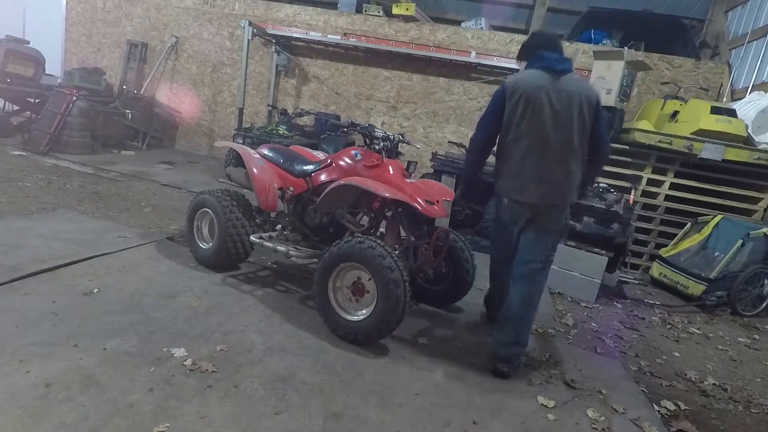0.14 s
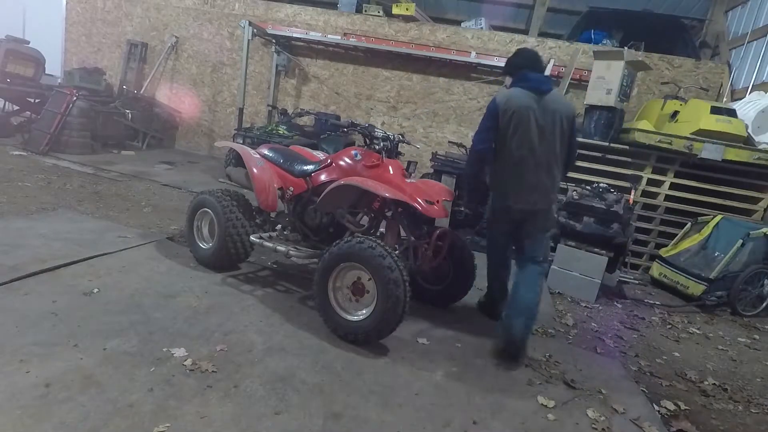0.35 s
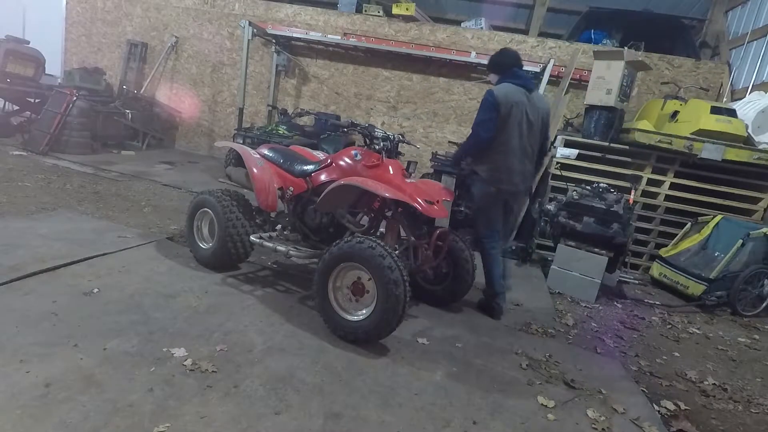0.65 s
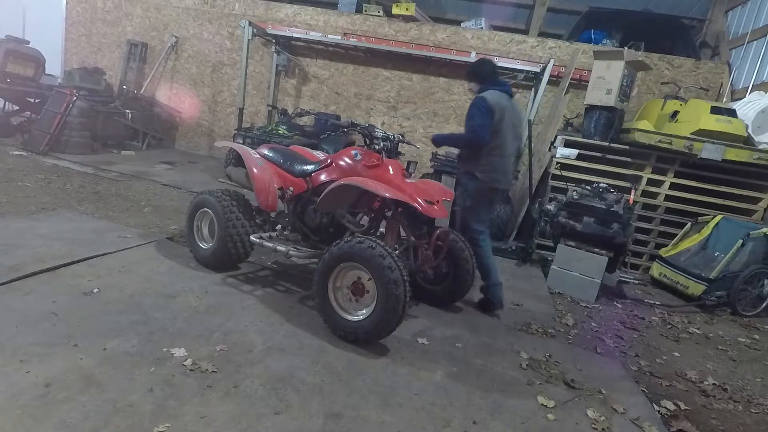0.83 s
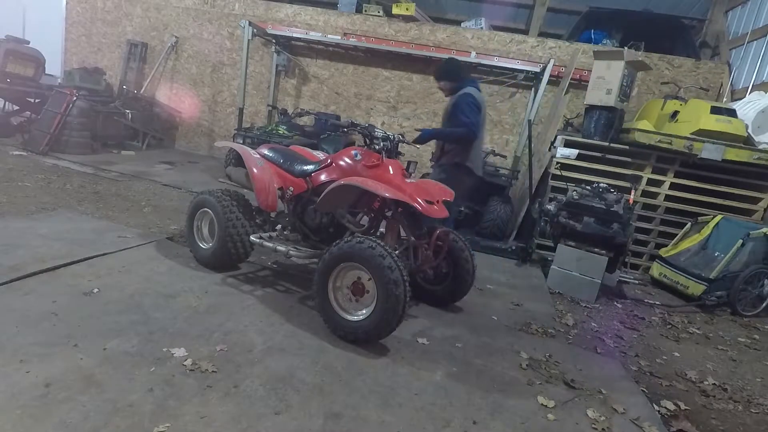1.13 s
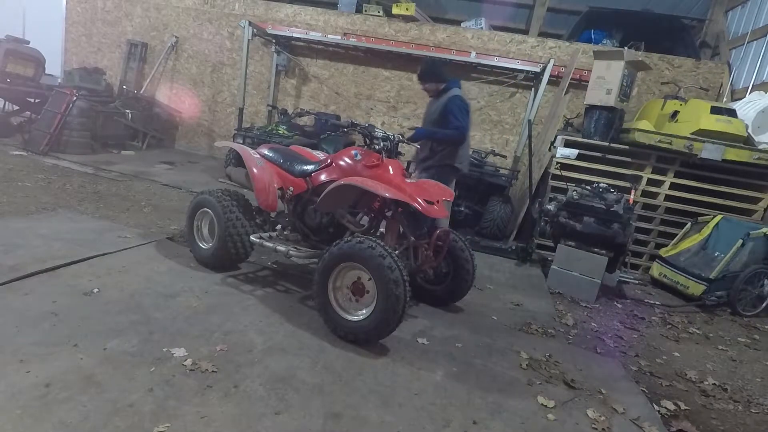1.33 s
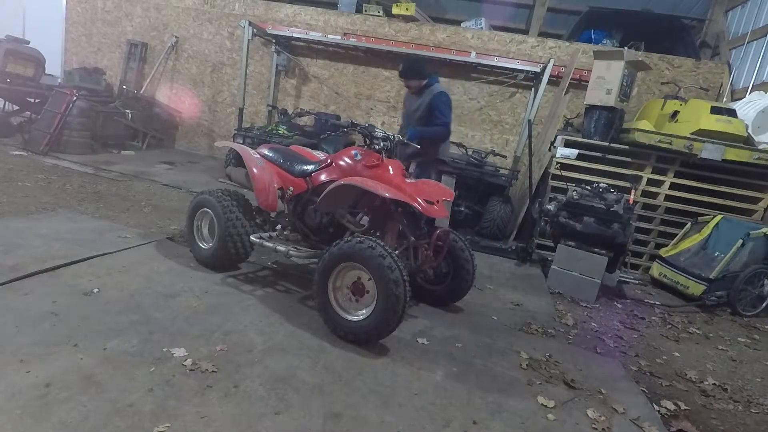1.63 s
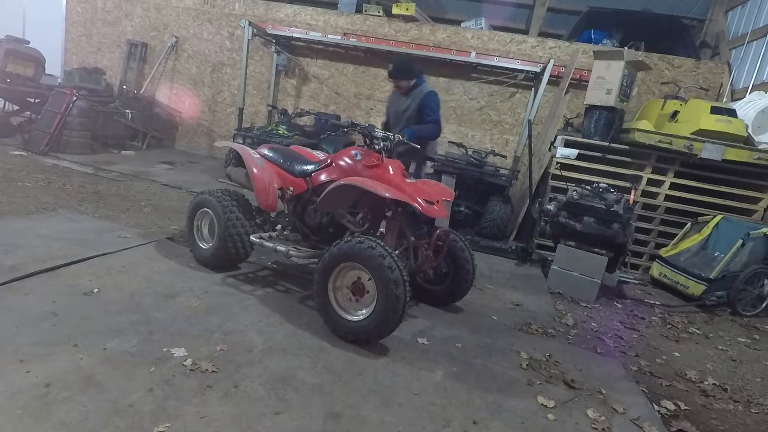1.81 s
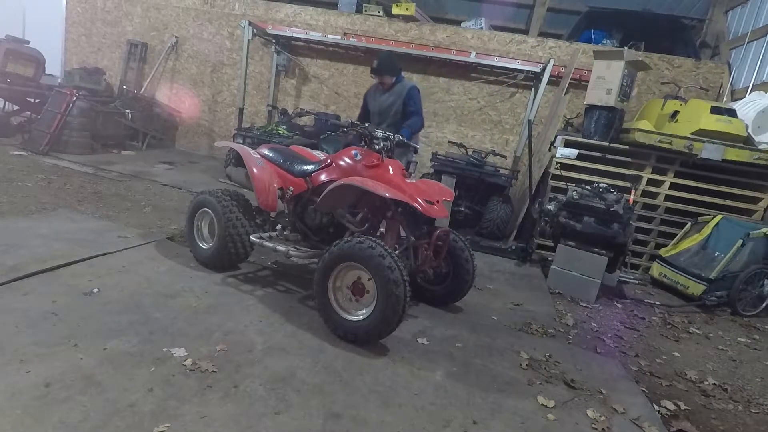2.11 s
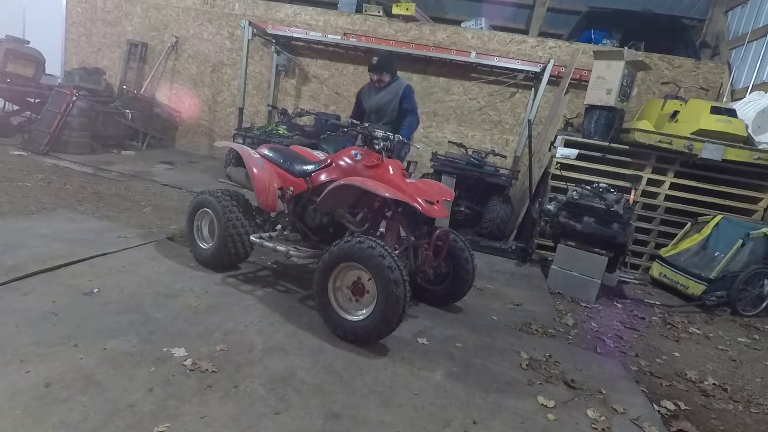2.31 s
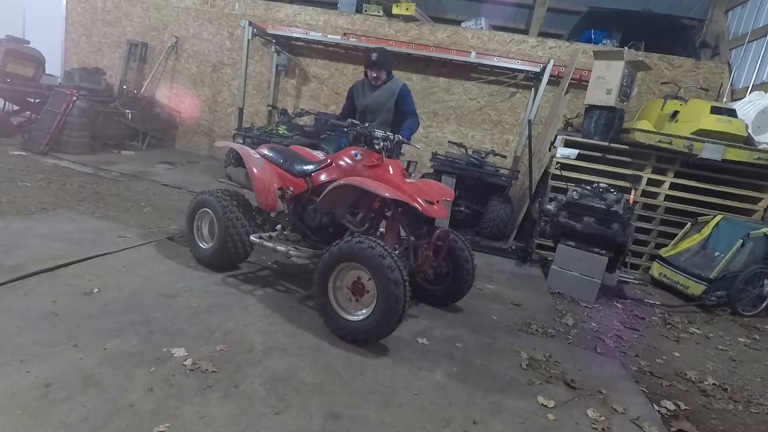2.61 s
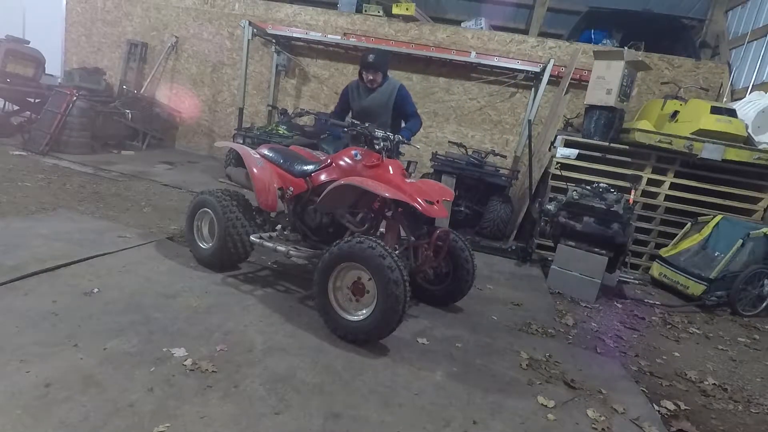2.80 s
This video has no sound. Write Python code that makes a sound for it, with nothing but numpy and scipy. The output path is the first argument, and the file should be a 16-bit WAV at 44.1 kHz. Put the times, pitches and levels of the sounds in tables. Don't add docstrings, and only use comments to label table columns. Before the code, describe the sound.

Dull, soft footsteps with gritty sole scuffs move off across a hard, ringing workshop floor

```python
import sys
import numpy as np
from scipy import signal
from scipy.fft import rfft, irfft, next_fast_len
from scipy.io import wavfile
from scipy.ndimage import map_coordinates

SR = 44100
rng = np.random.default_rng(int(sys.argv[2]) if len(sys.argv) > 2 else 0)


def invert_db(level):
    return 10 ** (np.asarray(level, dtype=float) / 20)


def bounce(signal):
    frames = np.transpose(np.atleast_2d(signal))
    limited = np.clip(frames, -1, 1)
    pcm = np.round(limited * 32767).astype(np.int16)
    wavfile.write(sys.argv[1], SR, pcm)


N = 130095


def unit(x):
    return x / np.sqrt(np.mean(x ** 2) + 1e-20)


def along(points, hz):
    point_hz, value = np.transpose(points)
    return np.interp(np.log(hz + 1), np.log(point_hz + 1), value)


def filtered(x, response):
    size = next_fast_len(len(x) + 8192)
    spectrum = rfft(x, size) * response(np.fft.rfftfreq(size, 1 / SR))
    return irfft(spectrum, size)[:len(x)]


def peak(hz, width):
    return lambda f: 1j * f * width / (hz * hz - f * f + 1j * f * width + 1e-9)


def add(out, start_s, x):
    part = out[max(round(start_s * SR), 0):][:len(x)]
    part += x[:len(part)]


# pitch_hz [Hz], level_db [dB per Hz]
AIR_TONE = [(25, 4), (45, -10), (80, -12), (200, -17.5), (600, -21.5), (1900, -27.5), (3500, -33.5),
            (15500, -39.5)]


def room_air():
    t = np.arange(N) / SR
    hiss = unit(filtered(rng.standard_normal(N), lambda f: invert_db(along(AIR_TONE, f)) * (f > 30)))

    deep = lambda f: peak(15, 27)(f) / (1 + (f / 33) ** 3)
    drift = unit(filtered(rng.standard_normal(N), deep))

    echo_hz = 330
    echo = unit(filtered(rng.standard_normal(N), peak(echo_hz, 2 * echo_hz)))
    echo = echo * invert_db(-48.5 - 60 * t)
    return invert_db(-56.5) * hiss + invert_db(-50) * drift + echo


# pitch_hz [Hz], time to die by 60 dB [s]
RING_TIMES = [(60, 1.3), (200, 1.26), (500, 1.075), (1500, 0.99), (4000, 0.91), (9000, 1.1), (15000, 0.6)]
# pitch_hz [Hz], level_db [dB]
HALL_TONE = [(60, 7), (130, 1.5), (220, 0), (320, -6.2), (700, 3.5), (2500, 2.23), (6000, -0.5), (15000, 1)]


def hall(x):
    first_wall_s, build_s = 0.012, 0.004
    near_t60_s, near_db = 0.083, -9
    hz, t, noise = signal.stft(rng.standard_normal(SR), SR, nperseg=1024)
    fade_db = 60 * t / along(RING_TIMES, hz)[:, None]
    shape = invert_db(along(HALL_TONE, hz)[:, None] - fade_db)
    tail = signal.istft(noise * shape, SR, nperseg=1024)[1][:SR]

    late_s = np.clip(np.arange(SR) / SR - first_wall_s, 0, None)
    build_up = 1 - np.exp(-late_s / build_s)
    near_walls = 1 + invert_db(near_db - 60 * late_s / near_t60_s)
    tail = tail * build_up * near_walls
    return signal.fftconvolve(x, tail / np.linalg.norm(tail))


# [Hz, centre of the hiss]
SCUFF_STROKES = [(0.001, .02, 0.12, -48.5, 3800), (0.081, 0.018, 0.036, -45.5, 6000),
                 (.16, 0.15, 0.17, -50.5, 3830), (0.284, 0.057, 0.034, -47.5, 2380),
                 (.337, 0.051, 0.034, -39, 10000), (0.335, 0.041, 0.017, -42, 2600),
                 (.38, 0.042, 0.023, -52, 6840), (.559, 0.011, 0.016, -48, 2780),
                 (0.666, .02, 0.09, -56.5, 1870), (0.736, 0.0088, 0.1, -57.5, 7000),
                 (0.849, .035, 0.12, -49.5, 4960), (0.854, 0.055, 0.032, -48, 11000),
                 (0.861, 0.071, 0.032, -44.5, 1830), (1.19, .012, 0.096, -56, 9000),
                 (1.289, 0.041, 0.18, -53, 1480), (1.299, 0.24, 0.17, -58, 5850),
                 (1.87, 0.055, 0.18, -53.5, 2310), (1.882, 0.077, 0.066, -59.5, 8840),
                 (2.13, 0.23, 0.27, -62.5, 7140), (2.03, .06, 0.24, -59.5, 1920),
                 (0.241, 0.026, 0.05, -52.5, 12000), (.1, 0.013, 0.047, -49, 10900),
                 (2.599, 0.028, .015, -62, 6950), (2.641, 0.0079, 0.17, -56, 2430),
                 (2.701, 0.055, 0.045, -60.5, 8900)]


def scuffs():
    grains_per_s, grit_db, grain_spread_db = 1200, -7, 2
    slip_db, slips_per_s = 1, 123.4
    hall_db, close_db, walk_away_s = -4.94, 3.5, 0.66
    out = np.zeros(N)
    for peak_s, rise_s, fall_s, level_db, pitch_hz in SCUFF_STROKES:
        t = np.arange(SR // 2) / SR - min(peak_s, 0.2)
        start_s = peak_s + t[0]
        chance, size = rng.random((2, len(t)))
        grit = (chance < grains_per_s / SR) * invert_db(-grain_spread_db * np.log(size + 1e-9))
        grit = invert_db(grit_db) * grit * np.sqrt(SR / grains_per_s)
        rub = rng.standard_normal(len(t)) * (1 + grit)

        band = peak(pitch_hz, 1.47 * pitch_hz)
        hiss = unit(filtered(rub, lambda f: band(f) ** 2))
        swell = np.exp(-2 * (t / rise_s) ** 2)
        fade = np.exp(-2 * (np.abs(t) / fall_s) ** 1.7)
        stroke = np.where(t < 0, swell, fade)
        slip = map_coordinates(rng.standard_normal(90), [(t - t[0]) * slips_per_s])
        scuff = invert_db(level_db + slip_db * slip) * stroke * hiss

        add(out, start_s, scuff)
        echo_db = hall_db - close_db * np.exp(-peak_s / walk_away_s)
        add(out, start_s, invert_db(echo_db) * hall(scuff))
    return out


# [dB, peak]
GRAIN_CRACKS = [
    (.278, -38),
    (.297, -37),
    (.3265, -23),
    (.337, -32),
    (.344, -32),
]


def snaps():
    snap_hz, snap_t60_s = 10000, 0.003
    out, t = np.zeros(N), np.arange(400) / SR
    for start_s, level_db in GRAIN_CRACKS:
        fade = invert_db(level_db - 60 * t / snap_t60_s)
        add(out, start_s, fade * np.sin(2 * np.pi * snap_hz * t))
    return out


# [Hz, centre of the noise]
SOLE_ROLLS = [(0.081, -39.5, 0.027, 387), (.222, -41, 0.11, 330), (0.547, -41.5, 0.02, 250),
              (0.817, -36, 0.033, 242), (0.868, -38.5, 0.051, 305), (1.235, -40.5, 0.013, 510),
              (1.275, -45, 0.042, 263), (1.79, -40, 0.044, 208), (1.85, -48.5, 0.09, 240),
              (2.13, -46, 0.0083, 1250), (2.15, -50.5, 0.042, 1000), (2.125, -50.5, 0.059, 367),
              (2.585, -41, 0.055, 115), (2.416, -55.5, 0.056, 297), (2.59, -44.5, 0.03, 494),
              (2.633, -31, 0.02, 360), (2.645, -33, .03, 185), (2.634, -42.5, 0.0075, 1560),
              (2.679, -42.5, 0.083, 418)]


def rolls():
    attack_s, release_s, hall_db = 0.0038, 0.0084, -3.5
    out, t = np.zeros(N), np.arange(SR // 4) / SR
    for start_s, level_db, hold_s, pitch_hz in SOLE_ROLLS:
        dull = lambda f: np.abs(peak(pitch_hz, 0.66 * pitch_hz)(f)) ** 1.39
        noise = unit(filtered(rng.standard_normal(len(t)), dull))
        press = 1 - np.exp(-t / attack_s)
        let_go = np.exp(-np.clip(t - hold_s, 0, None) / release_s)
        squash = invert_db(level_db) * press * let_go * noise
        add(out, start_s, squash)
        add(out, start_s, invert_db(hall_db) * hall(squash))
    return out


# start_s [s], level_db [dB, peak], pitch_hz [Hz], ring [cycles], click_db [dB over the thud]
FOOT_CONTACTS = [(.088, -34, 238, 0.88, -31), (.1, -37.5, 592.6, 11, -1.5), (0.196, -23, 330, 1.27, -19),
                 (0.266, -33, 330, 1.5, -33), (.553, -43, 448, 1.8, -5), (.812, -23, 364, 0.86, -26),
                 (0.821, -37.5, 900, 0.5, 2), (0.863, -21.5, 235, 2.04, -29), (0.951, -32, 225, 2.9, -32),
                 (1.23, -29, 264, 0.87, -16), (1.256, -35, 384, 5.4, -18), (1.248, -39, 132.5, 4.2, -35),
                 (1.761, -27, 327, 1.32, -26), (1.782, -31, 229, 2.2, -30), (1.921, -43.5, 243, 2.4, -41),
                 (2.13, -30.5, 1035, 1.96, -15), (2.141, -41, 117, 1.6, -22), (2.414, -36, 242, 0.9, -31),
                 (2.591, -40, 1340, 3, -7), (2.596, -33.5, 381, 8.7, -16), (2.634, -25, 385, 3, -9.5),
                 (2.653, -33.5, 339, 8.6, -22), (2.64, -33, 60, 0.5, -33), (2.677, -29, 637, 4.4, -23)]


def thuds():
    click_hz, click_t60_s, hall_db = 900, 0.03, -2.5
    out, t = np.zeros(N), np.arange(SR // 10) / SR
    click_band = lambda f: peak(click_hz, 2 * click_hz)(f) ** 2
    for start_s, level_db, pitch_hz, cycles, click_db in FOOT_CONTACTS:
        age = 3 * t * pitch_hz / cycles
        swell_and_fade = np.e * age * np.exp(-age)
        body = swell_and_fade * np.sin(2 * np.pi * pitch_hz * t)
        click = unit(filtered(rng.standard_normal(len(t)), click_band))
        click = click * invert_db(click_db - 60 * t / click_t60_s)
        hit = invert_db(level_db) * (body + click)
        add(out, start_s, hit)
        add(out, start_s, invert_db(hall_db) * hall(hit))
    return out


def scene():
    mix = room_air() + scuffs() + snaps() + rolls() + thuds()
    return mix[None]


def top_cut(x):
    return signal.sosfilt(signal.butter(12, 15660, fs=SR, output="sos"), x)


def record(dry):
    mix = filtered(dry[0], lambda f: f < 15330)[None]
    return top_cut(mix)


dry = scene()
out = record(dry)
bounce(out)
```